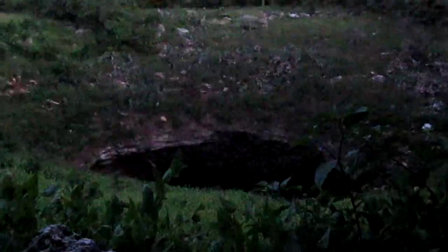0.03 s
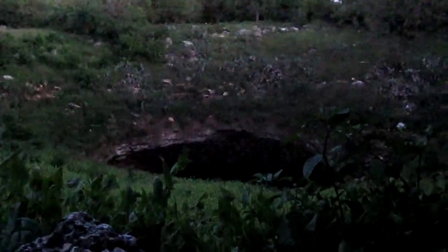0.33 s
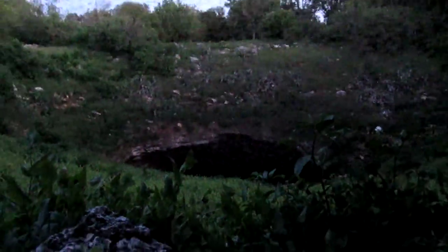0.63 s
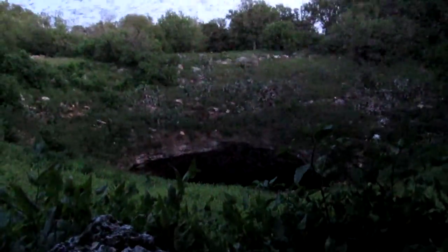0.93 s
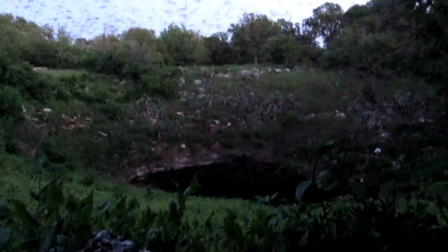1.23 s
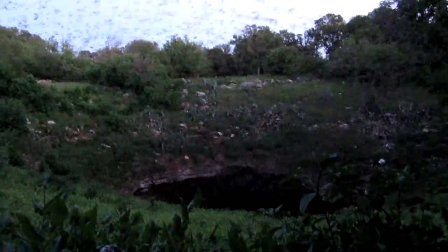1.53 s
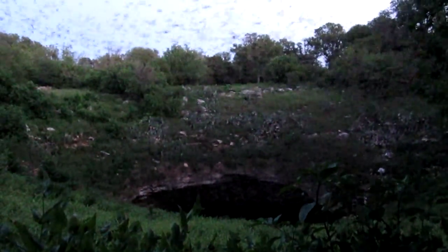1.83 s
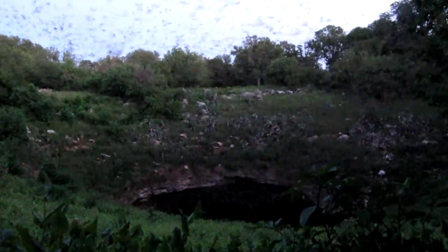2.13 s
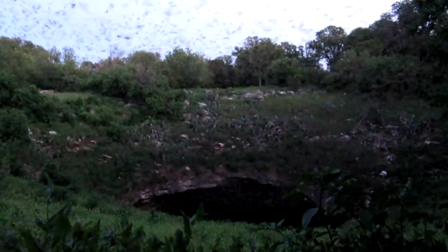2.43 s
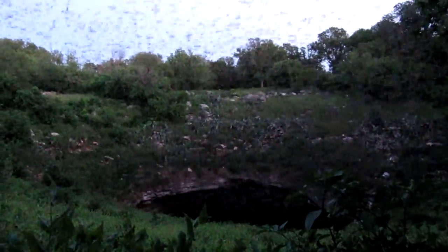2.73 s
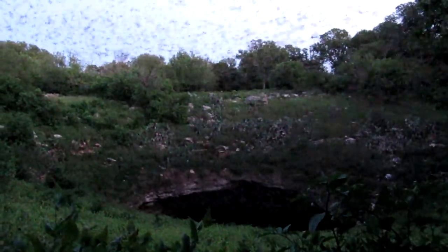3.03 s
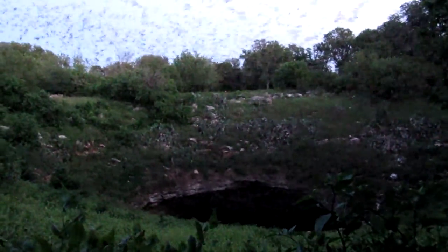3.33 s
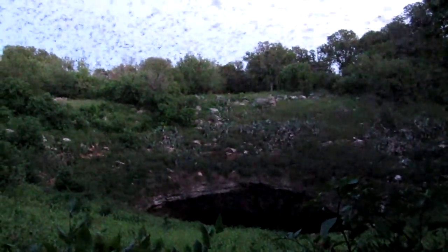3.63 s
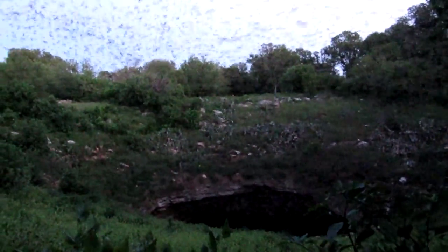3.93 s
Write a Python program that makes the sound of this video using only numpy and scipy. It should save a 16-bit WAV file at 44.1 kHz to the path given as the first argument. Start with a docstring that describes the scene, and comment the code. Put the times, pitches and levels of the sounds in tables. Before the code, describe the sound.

Countless bat wings make a steady rush and high hiss outside a cave, with faint ticks and a few short chirps. Crickets trill throughout over a low rumble of air. Something small clicks once near the microphone.

```python
"""Bats stream out of a cave at dusk. From the start, countless wings blur into a steady rush with a
high hiss and faint ticks, while far crickets sing and the air rumbles low. At about 0.2 s the first of
a few bat chirps sounds, and a near cricket starts rubbing its wings in half-second trills.
At 1.3 s something small and hard slides, clicks and rings briefly, close to the single microphone.
The trills and chirps go on, and the hiss grows a little louder at the end."""
import sys
import numpy as np
from scipy import signal
from scipy.fft import rfft, irfft, next_fast_len
from scipy.io import wavfile
from scipy.ndimage import uniform_filter1d, map_coordinates

SR = 44100
rng = np.random.default_rng(int(sys.argv[2]) if len(sys.argv) > 2 else 0)


def log_audio(samples):
    """Write samples as a 16-bit WAV file to the path given in sys.argv[1]."""
    # one column per channel
    frames = np.atleast_2d(samples).T
    # limit to full scale, then quantise
    limited = np.clip(frames, -1, 1)
    pcm = np.round(limited * 32767).astype(np.int16)
    wavfile.write(sys.argv[1], SR, pcm)


N = 176400


def amp(db):
    """Turn decibels into a number to multiply by."""
    return 10 ** (np.asarray(db) / 20)


def unit(x):
    """Scale a signal to an average power of 1."""
    return x / np.sqrt(np.mean(x ** 2) + 1e-20)


def clock():
    """The time of each sample, in seconds."""
    return np.arange(N) / SR


def wobble(rate):
    """A smooth curve through `rate` random points a second."""
    return map_coordinates(rng.standard_normal(8192), [clock() * rate + 2], mode="wrap")


def filtered(x, response):
    """Multiply each frequency in x by response(hz)."""
    size = next_fast_len(N + SR // 2)
    return irfft(rfft(x, size) * response(np.fft.rfftfreq(size, 1 / SR)), size)[:N]


def coloured(x, points):
    """Give x the tone colour in a table (f/Hz, level/dB), at an average power of 1."""
    f, db = np.transpose(points)
    return unit(filtered(x, lambda hz: amp(np.interp(np.log(hz + 1), np.log(f), db))))


def patchy(depth_db):
    """White noise, a bit louder or softer in random patches of pitch and time."""
    spectrum = signal.stft(rng.standard_normal(N), nperseg=512)[2]
    patches = uniform_filter1d(rng.standard_normal(spectrum.shape), size=12, axis=0)
    patches = uniform_filter1d(patches, size=8, axis=1)
    return signal.istft(spectrum * amp(depth_db * unit(patches)), nperseg=512)[1][:N]


def gate(start, length, fade_s):
    """Fade in, hold, fade out."""
    t = clock() - start
    return np.sqrt(np.clip(np.minimum(t, length - t) / fade_s, 0, 1))


# Tone colour of the wings: f/Hz, relative level/dB
WING_COLOUR = [(150, -4.5), (270, -3), (410, 2.5), (520, -1.5), (900, -4.7), (1500, -3.4), (2400, -2.7),
               (3200, -2), (4200, -2.5), (5800, -6), (7300, -8), (10000, -15), (13000, -18.2),
               (15700, -16.6)]

def wing_rush():
    """Countless far wingbeats blur into one steady rush."""
    return amp(-46 + .38 * wobble(24.9)) * coloured(patchy(depth_db=.5), WING_COLOUR)


# Tone colour of the hiss: f/Hz, relative level/dB
HISS_COLOUR = [(5000, -57), (7000, -20.5), (8000, -8.5), (8800, -4), (9500, -1.1), (10100, -1.8),
               (11000, -8.5), (11900, -18), (13000, -27), (15000, -56)]
# How the hiss rises and falls: t/s, relative level/dB
HISS_LOUDNESS = [(0.06, -46.5), (0.22, -45.5), (1.13, -45), (1.38, -46), (2.28, -45), (3.51, -45),
                 (3.98, -43)]

def swarm_hiss():
    """The far swarm also makes a high hiss that flickers slightly."""
    level_db = np.interp(clock(), *np.transpose(HISS_LOUDNESS)) + .6
    return amp(level_db + .64 * wobble(34.97)) * coloured(patchy(depth_db=.74), HISS_COLOUR)


# Pitch bands of the ticks: middle f/Hz, level/dB
TICK_PITCHES = [(3300, -64), (7000, -63), (9700, -58), (14000, -70)]

def bat_ticks(per_second=65, half_width_octaves=.3):
    """The nearest bats tick at random, each in its own band of pitch."""
    out = np.zeros(N)
    for centre, db in TICK_PITCHES:
        hits = rng.random(N) < per_second / SR
        sizes = amp(5.5 * np.clip(rng.standard_normal(N), -2, 2))
        ticks = hits * sizes * rng.choice([-1, 1], N)
        band = lambda hz: np.exp(-(np.log2((hz + 1) / centre) / half_width_octaves) ** 2)
        out += amp(db) * unit(filtered(ticks, band))
    return out


# Bat calls: middle t/s, middle f/Hz, length/s, peak level/dB
BAT_CALLS = [(.181, 7000, .016, -46), (1.243, 12800, .008, -50), (1.575, 14600, .014, -52),
             (2.486, 6600, 0.02, -50), (2.919, 14500, .008, -52), (3.035, 7400, .02, -46),
             (3.35, 14700, .006, -51), (3.421, 13900, .006, -53), (3.736, 12400, .008, -49)]

def bat_chirps(fall=.08):
    """Short, raspy bat calls; each loses the share `fall` of its pitch."""
    out, rasp_hz = np.zeros(N), 900 * wobble(2500)
    for middle, hz, length, db in BAT_CALLS:
        progress = np.clip((clock() - middle) / length, -2, 2)
        pitch = hz * (1 - fall * progress) + rasp_hz
        out += amp(db) * np.exp(-(2 * progress) ** 2) * np.sin(2 * np.pi * np.cumsum(pitch) / SR)
    return out


def ring(tones, t):
    """A struck object rings with fading tones; neighbouring tones swing opposite ways."""
    return sum((-1) ** k * amp(db + rng.normal(0, 1) - 60 * t / fade_s) * np.sin(2 * np.pi * hz * t)
               for k, (hz, db, fade_s) in enumerate(tones))


# The hits that make up the click: t/s, relative snap level/dB, relative body level/dB
CLICK_HITS = [(1.3030, -16, -37), (1.3084, -10.5, -25), (1.3092, -8.5, -16.5)]
# Lower tones of the object's body: f/Hz, relative level/dB, time to fade by 60 dB/s
BODY_TONES = [(963, -11.5, .05), (1170, -12, 0.027), (1770, -6.5, 0.021), (2180, -8, .018),
              (2580, -5, 0.016), (3170, 2, .014), (4140, -4, .005), (4800, -4, .007), (5600, -6, .004),
              (7000, -10, 0.0074)]
# High tones of the snap: f/Hz, relative level/dB, time to fade by 60 dB/s
SNAP_TONES = [(8500, -8, 0.0058), (9200, -3, 0.0062), (10430, 0.5, .005), (11500, 1.5, 0.0049),
              (12500, -6, .004)]

def click(crack_fade_s=.0049):
    """A small, hard thing makes a light tick, then a double snap, so fast it sounds like one click."""
    out, t = np.zeros(N), np.arange(SR // 10) / SR
    for start, snap_db, body_db in CLICK_HITS:
        crack = amp(-5.5 - 60 * t / crack_fade_s) * rng.standard_normal(len(t))
        snap = amp(snap_db) * (ring(SNAP_TONES, t) + crack)
        body = amp(body_db) * ring(BODY_TONES, t)
        out[round(start * SR):][:len(t)] += (snap + body) / 2
    # The object is too small to give off bass, and the contact softens the highest tones.
    out = signal.sosfilt(signal.butter(2, 700, "high", fs=SR, output="sos"), out)
    return signal.sosfilt(signal.butter(6, 12400, fs=SR, output="sos"), out)


# Tone colour of the slide: f/Hz, relative level/dB
SLIDE_COLOUR = [(300, -27), (900, 5), (3000, 3.5), (6000, -4), (10500, 5), (13000, -15), (16000, -25)]

def slide():
    """The object scrapes briefly on its way into the click."""
    loudness = amp(-38.5) * gate(start=1.287, length=.0276, fade_s=.005)
    return loudness * coloured(rng.standard_normal(N), SLIDE_COLOUR)


def wing_rub(hz, strokes_per_s, smear, sharpness, fall_hz=140):
    """Each cricket wing stroke is a short falling tone; scattering on the way smears it into noise."""
    stroke = np.cumsum(strokes_per_s * (1 + .017 * wobble(12))) / SR % 1  # 0 to 1 in each stroke
    pulse = np.abs(np.sin(np.pi * stroke)) ** sharpness * amp(1.6 * wobble(50))
    pitch = hz + fall_hz * (.5 - stroke) + 25 * wobble(60)
    phase = 2 * np.pi * np.cumsum(pitch) / SR
    scattered = wobble(230) * np.sin(phase) + wobble(230) * np.cos(phase)
    return unit(unit(pulse * np.sin(phase)) + smear * unit(scattered))


# Trills of the near cricket: start t/s, length/s, level/dB at the loudest point
NEAR_TRILLS = [(.22, 0.53, -56), (.83, 0.64, -51), (1.616, 0.61, -50), (2.39, 0.65, -50.6),
               (3.24, 0.28, -53.5)]

def near_cricket(swell_db=2.4):
    """One cricket rubs its wings in bursts, each loudest in its middle."""
    bursts = np.zeros(N)
    for start, length, db in NEAR_TRILLS:
        off_middle = np.minimum((2 * (clock() - start) / length - 1) ** 2, 1)
        bursts += amp(db - swell_db * off_middle) * gate(start, length, fade_s=.09)
    return bursts * wing_rub(hz=4803, strokes_per_s=66, smear=.33, sharpness=4.5)


# One row for each far cricket: f/Hz, wing strokes a second, level/dB
FAR_CRICKETS = [(4646, 59, -59), (5035, 71, -60), (5174, 63, -59.2), (5320, 68, -59.5)]

def far_crickets():
    """Far crickets sing without a break, blurred by the distance."""
    return sum(amp(db + 1.6 * wobble(4.9)) * wing_rub(hz, rate, smear=.9, sharpness=2.2)
               for hz, rate, db in FAR_CRICKETS)


# Tone colour of the air: f/Hz, relative level/dB
AIR_COLOUR = [(12, -16), (28, -5), (48, -2.5), (63, 0), (74, -2), (90, -3.5), (115, -13), (155, -10.5),
              (250, -17.5), (600, -40.5)]

def air():
    """The air makes a low, steady rumble."""
    return amp(-50.6 + .3 * wobble(6.16)) * coloured(rng.standard_normal(N), AIR_COLOUR)


def scene():
    """Everything reaches one microphone, so left and right are the same."""
    swarm = wing_rush() + swarm_hiss() + bat_ticks()
    mono = swarm + air() + near_cricket() + far_crickets() + bat_chirps() + click() + slide()
    return np.array([mono, mono])


def record(dry, opens_s=.036, top_hz=15750):
    """The microphone opens after a moment and lets nothing above top_hz through."""
    opened = np.where(clock() > opens_s, 1, amp(-70))
    return np.array([filtered(channel * opened, lambda hz: hz < top_hz) for channel in dry])


dry = scene()
out = record(dry)
log_audio(out)
```